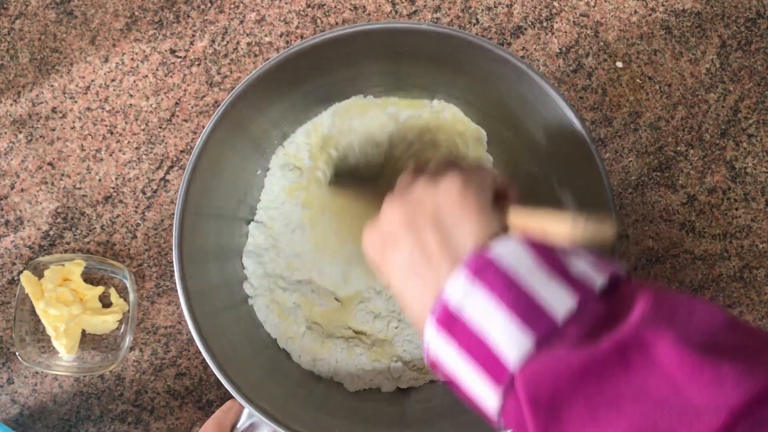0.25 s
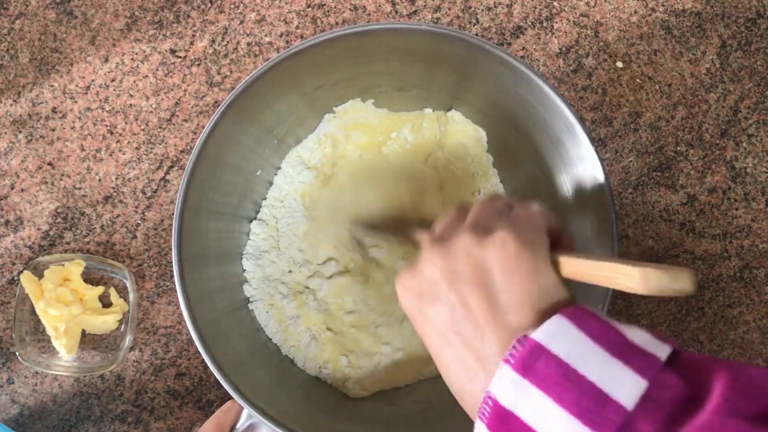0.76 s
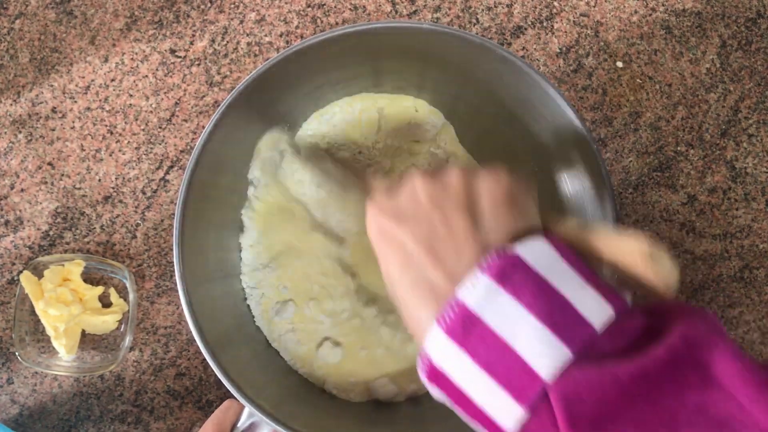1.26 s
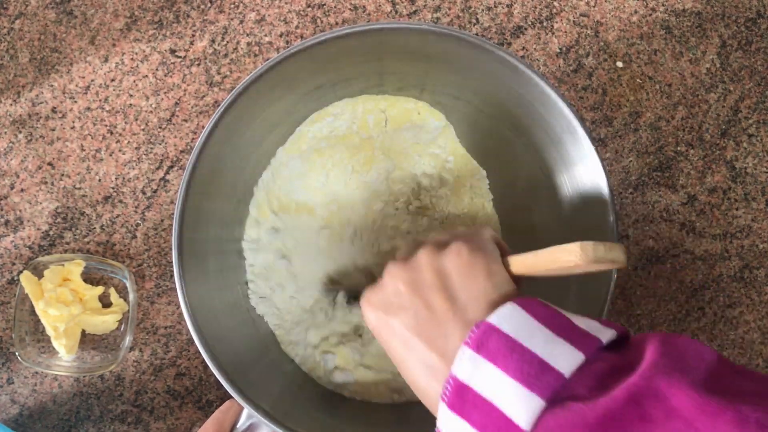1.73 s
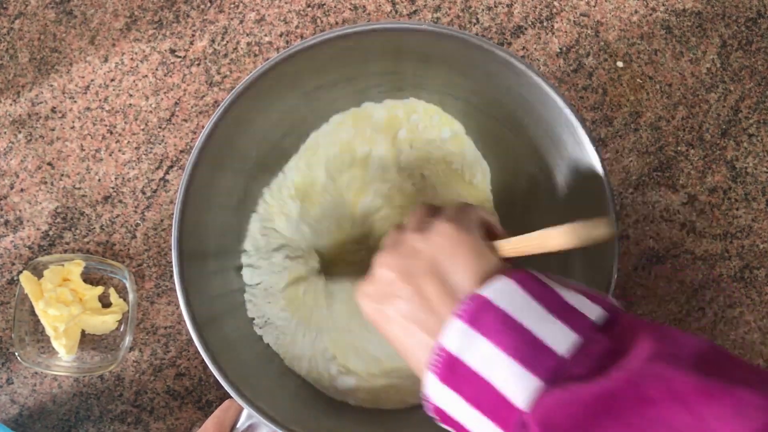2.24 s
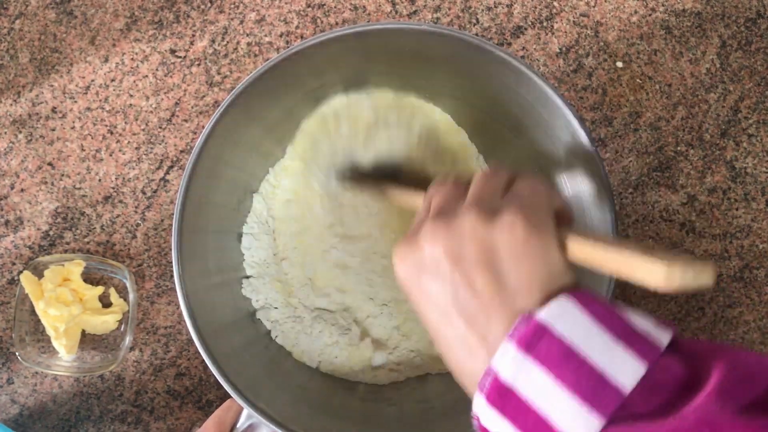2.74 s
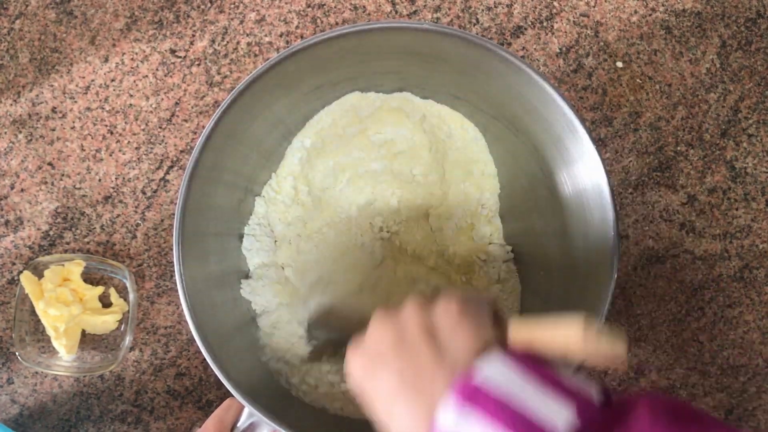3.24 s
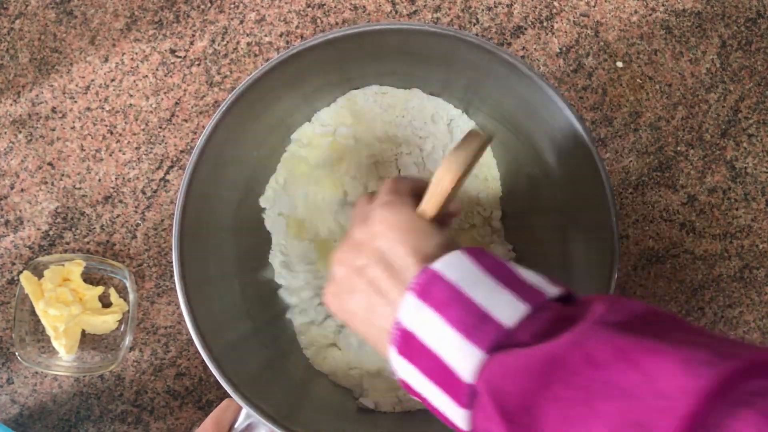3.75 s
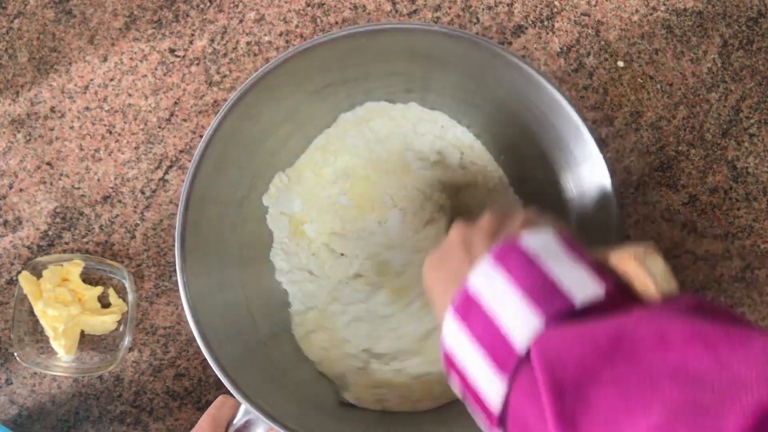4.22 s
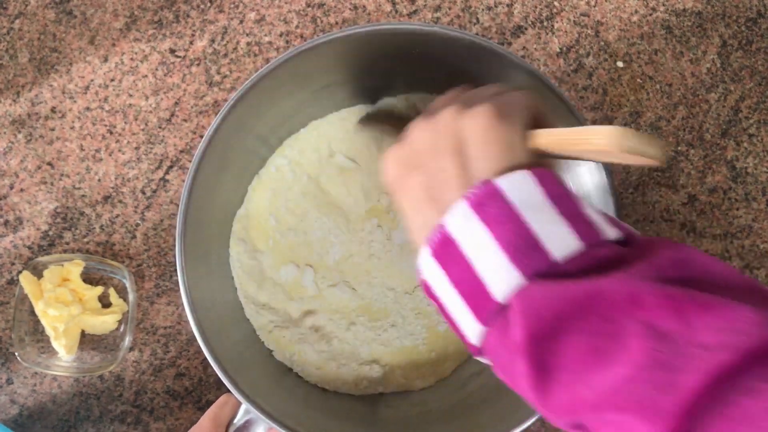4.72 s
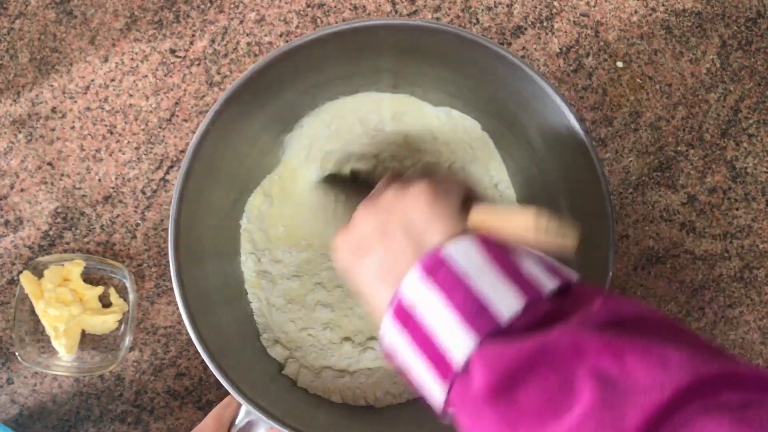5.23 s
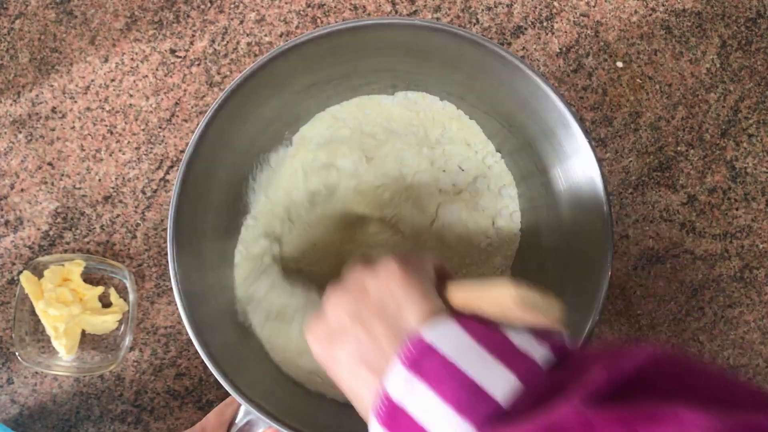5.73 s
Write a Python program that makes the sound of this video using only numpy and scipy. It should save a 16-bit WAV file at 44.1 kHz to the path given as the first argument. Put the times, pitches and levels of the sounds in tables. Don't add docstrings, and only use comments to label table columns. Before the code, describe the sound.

Close to a single microphone in a quiet kitchen, a wooden spatula sweeps dry flour round a steel bowl. Brisk strokes come two or three a second, each starting with a tick and trailing into grainy scraping. Thin metallic squeaks flicker at the rim; the bowl bumps dully on stone, with the strongest thuds and one sharp knock in the last second.

```python
import sys
import numpy as np
from scipy import signal
from scipy.fft import rfft, irfft, next_fast_len
from scipy.io import wavfile
from scipy.ndimage import uniform_filter1d

SR = 44100
rng = np.random.default_rng(int(sys.argv[2]) if len(sys.argv) > 2 else 0)


def makeup_ratio(level_db):
    decades = np.asarray(level_db, float) / 20
    return 10 ** decades


def pcm_store(signal):
    levels = np.round(np.clip(np.atleast_2d(signal), -1, 1) * 32767)
    wavfile.write(sys.argv[1], SR, levels.astype(np.int16).T)


N = 263365

# (frequency [Hz], width [Hz], level [dB])
WALL_MODES = [(800, 1200, -82), (946, 23, 11), (1100, 175, 13.5), (1280, 320, -91), (1520, 140, 3),
              (1640, 46, 12), (1780, 48, -0.5), (1890, 28, 9.5), (2150, 98, -4), (2310, 26, 12.5),
              (2396, 370, 11), (2750, 120, -28)]
# (frequency [Hz], density [dB per Hz])
GRIT_SPECTRUM = [(300, -5), (700, -4.5), (2600, -13), (3300, -3), (4500, -0.5), (4900, -6.5), (5250, 2),
                 (6500, -1.5), (8500, -2.5), (9800, -4), (10400, -11), (11200, -5), (12800, -3),
                 (16000, -10)]


def drag():
    # (landing [s], length [s], grit hiss [dB], wall shaking [dB],
    # best-driven wall region [Hz])
    strokes = [(0.0, 0.085, -43, -47, 1600), (0.261, 0.21, -40.5, -41.5, 1730),
               (0.535, 0.12, -53.5, -62, 1890), (0.618, 0.12, -50, -51, 2400),
               (0.651, .22, -43.5, -46.5, 1850), (1.001, 0.31, -39, -41, 1740),
               (1.423, 0.3, -47, -51.5, 1780), (1.75, 0.19, -41, -43.5, 1800),
               (2.134, 0.21, -38, -39, 1950), (2.528, 0.18, -49.5, -57, 2360), (2.557, .18, -42, -42, 2480),
               (2.832, 0.083, -53.5, -64, 1780), (2.939, 0.22, -39.5, -39.5, 1870),
               (3.321, 0.24, -41, -44, 1680), (3.68, 0.26, -42.5, -41.5, 1700),
               (4.069, 0.42, -45.5, -45.5, 1560), (4.618, 0.093, -48, -49.5, 2100),
               (4.756, 0.043, -48, -46.5, 1750), (5.083, 0.099, -57, -43, 1020),
               (5.29, .14, -59, -49.5, 1900), (5.481, 0.11, -54, -44.5, 1100),
               (5.678, 0.14, -49, -45.5, 1640), (5.727, 0.09, -47, -38.5, 1310),
               (5.907, 0.12, -46.5, -47.5, 1650)]
    # (strongest [s], half length [s], grit hiss [dB],
    # wall shaking [dB], edge whistle [dB])
    pushes = [(0.271, 0.088, -48.5, -52.5, -58), (0.977, 0.029, -54, -82, -49.5),
              (1.21, 0.18, -50.5, -75, -50.5), (1.385, 0.021, -66, -90, -51.5),
              (1.522, 0.081, -56, -49, -44), (1.678, 0.35, -54.5, -60, -57.5),
              (1.905, 0.079, -54, -66, -46.5), (2.13, 0.047, -52.5, -59, -55),
              (2.29, 0.15, -49.5, -58.5, -48), (2.686, 0.08, -45, -56, -54), (2.888, 0.071, -66, -79, -54),
              (3.045, 0.18, -42.5, -50.5, -50), (3.264, .08, -59, -66, -68),
              (3.406, 0.086, -38.5, -39, -47), (3.761, .1, -47, -64, -41), (4.138, 0.075, -46, -41.5, -38),
              (4.354, 0.12, -46.5, -52.5, -56), (4.56, 0.26, -53.5, -66.5, -46),
              (4.863, 0.08, -44, -43, -40.5), (5.087, 0.32, -49.5, -63, -51), (5.255, 0.1, -46.5, -48, -68),
              (5.408, 0.13, -46.5, -58, -47), (5.633, 0.21, -45.5, -53, -48.5),
              (5.83, 0.15, -48.5, -56.5, -50)]
    # (strongest [s], half length [s], edge whistle [dB])
    squeaks = [(0.277, .02, -34), (.628, .015, -45), (.66, 0.014, -38), (1.017, 0.022, -42),
               (1.45, 0.031, -44), (1.635, .03, -50), (2.86, 0.031, -51), (3.186, 0.033, -48),
               (3.344, 0.036, -36), (4.617, 0.027, -47), (4.76, 0.018, -45.5)]
    landing_s, push_hz, stroke_rim_db = 0.003, 1520, -8.5
    fall_db = np.array([20, 20 * 1.17, 20 * 1.8])
    t = np.arange(0, N / SR, 0.0005)
    power = np.full((3, len(t)), 1e-12)
    focus = np.full(len(t), 1e-12 * push_hz)
    for s, length, hiss_db, wall_db, region_hz in strokes:
        gone = np.maximum(t - s, 0) / length
        start_db = np.c_[[hiss_db, wall_db, hiss_db + stroke_rim_db]]
        landing = np.clip((t - s) / landing_s, 0, 1) ** 2
        part = landing * makeup_ratio(start_db - np.outer(fall_db, gone ** 1.86)) ** 2
        power += part
        focus += part[1] * region_hz * (1 - 0.35 * np.minimum(gone, 1))
    for s, half, *levels_db in pushes:
        part = swell(t, s, half, np.c_[levels_db]) ** 2
        power += part
        focus += part[1] * push_hz
    for s, half, whistle_db in squeaks:
        power[2] += swell(t, s, half, whistle_db) ** 2
    rows = (*10 * np.log10(power), focus / power[1])
    return [np.interp(np.arange(N) / SR, t, row) for row in rows]


def scraping(hiss_db, wall_db, rim_db, focus_hz):
    # (frequency [Hz], width [Hz], level [dB])
    foot_modes = [(156, 51, 1.5), (220, 75, 4.5), (315, 29, -4), (366.5, 26, 1.5), (420, 41, -7),
                  (470, 130, -12.5)]
    # (frequency [Hz], width [Hz], level [dB])
    rim_modes = [(6300, 500, -25.5), (6910, 90, -7), (7590, 1200, 16.5), (8200, 130, 12)]
    fine = grains(20000, 0.8, 0.8)
    coarse = grains(4000, 2.4, 1.4)
    hiss = mottled(coloured(evened(fine) + 0.48 * evened(coarse), GRIT_SPECTRUM), 2.2)
    wall = body(coarse, WALL_MODES, 0.014, 2.0, focus_hz, 9)
    blade = evened(resonate(resonate(coarse, focus_hz, 920), 1910.0, 2860))
    blade = evened(high_pass(blade, 2, 850))
    rim = body(fine, rim_modes, 0.02, 2.2)
    foot = body(coarse, foot_modes, 0.015, 2.2)
    foot_db = lagged(wall_db, 0.024) - 0.5
    sound = makeup_ratio(hiss_db - 3.5) * hiss
    sound += makeup_ratio(wall_db - 1.52) * mottled(wall + makeup_ratio(-2.5) * blade, 1.72)
    sound += makeup_ratio(foot_db - 8.0) * foot
    return sound + makeup_ratio(rim_db - 6) * rim


def grains(per_s, spread_db, lumpy_db):
    size = makeup_ratio(spread_db * np.minimum(rng.exponential(1, N), 5))
    clicks = rng.standard_normal(N) * (rng.random(N) < per_s / SR)
    return size * clicks * makeup_ratio(lumpy_db * drift(170))


def spatula_ticks():
    # (time [s], peak [dB], tip tone [Hz], bright crack over the peak [dB])
    strikes = [(0.0044, -34, 2480, -3), (0.266, -19, 2400, 2.5), (0.2712, -23.5, 1520, -2),
               (0.6585, -23, 2420, -1), (1.008, -14.5, 1520, -3), (1.057, -29.5, 1640, 8),
               (1.2901, -39.5, 1520, -12), (1.4231, -54, 2590, -12), (1.7536, -28, 1730, -3),
               (2.138, -23.5, 1520, -2), (2.566, -37, 2430, -15), (2.6361, -30.5, 1600, 7.5),
               (2.696, -40, 1500, -6), (2.815, -27.5, 2120, -35), (2.821, -31.5, 2180, -31),
               (2.941, -35, 1280, -15), (3.3155, -39, 2120, 0), (3.345, -28, 2040, -5),
               (3.6794, -22.5, 1104, -26), (3.7205, -32, 1060, 7), (3.846, -31.5, 1850, 3.5),
               (4.0745, -31, 2150, -19), (4.147, -26.5, 1500, -19), (4.2205, -36, 1110, -24),
               (4.6205, -36.5, 1340, -29), (4.759, -29, 2380, -6), (4.8157, -36, 1820, -15),
               (5.296, -33, 2310, -12), (5.689, -30, 2900, 6), (5.7395, -12.5, 2310, -0.5)]
    mix = np.zeros(N)
    for s, *blow in strikes:
        add(mix, s, tick(*blow))
    return mix


def tick(peak_db, tip_hz, crack_db):
    t = np.arange(2048) / SR
    chance = rng.standard_normal(len(t))
    rise = t * tip_hz / 2.2
    burst = np.sin(2 * np.pi * tip_hz * t) * rise * np.exp(1 - rise)
    ring = np.zeros(len(t))
    for (hz, width, db), luck in zip(WALL_MODES, chance):
        level_db = db + 1.6 * np.clip(luck, -1, 1) - 2.4 * abs(np.log2(hz / tip_hz))
        ring += makeup_ratio(level_db - 60 * t / 0.027) * np.sin(2 * np.pi * hz * t + 3 * luck)
    ring *= 1 - np.exp(-t / 0.0015)
    crack = coloured(chance, GRIT_SPECTRUM[2:]) * makeup_ratio(-60 * t / 0.073) * (1 - np.exp(-t / 0.00019))
    sound = 0.45 * burst + makeup_ratio(-23.5) * ring + makeup_ratio(crack_db - 16.5) * crack
    fade_out = signal.windows.tukey(2 * len(t), 0.3)[len(t):]
    return makeup_ratio(peak_db) * sound * fade_out


def bowl_thuds():
    # (time [s], peak [dB], wall tone [Hz], counter thump over the peak [dB])
    slaps = [(0.004, -37.5, 396, -8), (1.427, -39.5, 340, -1.5), (1.552, -31.5, 337, -8),
             (1.754, -27.5, 434, -10.5), (2.177, -42, 355, 18), (2.564, -36.5, 397, 15),
             (2.945, -24.5, 368, -13), (3.023, -32, 360, -7), (3.316, -25.5, 385, -13),
             (3.684, -24.5, 396, -1.5), (3.852, -32.5, 420, 8.5), (4.755, -39.5, 425, -1),
             (5.099, -14, 430, -8), (5.497, -17.5, 412, -9.5), (5.93, -21.5, 403, -5.5)]
    # (time [s], peak [dB], wall tone [Hz], counter thump over the peak [dB])
    rocks = [(0.274, -34.5, 351, -12), (0.294, -42.5, 342, 6), (0.664, -54, 366, -21), (0.727, -49, 423, 8),
             (1.013, -31, 360, -7.5), (1.816, -27, 332, -1.5), (2.239, -34.5, 361, 5),
             (2.557, -42.5, 394, 3), (2.695, -42.5, 360, -1), (2.821, -50, 350, -13),
             (4.073, -44.5, 343, 8), (4.22, -40.5, 368, -15), (4.62, -32.5, 361, 1), (4.817, -37.5, 370, 8),
             (5.301, -30.5, 350, 0), (5.691, -30, 457, -2), (5.744, -18.5, 356, -1.5)]
    mix = np.zeros(N)
    for events, slap_db in ((slaps, -7.5), (rocks, -21)):
        for s, *blow in events:
            add(mix, s, thud(*blow, slap_db))
    return high_pass(mix, 2, 85)


def thud(peak_db, wall_hz, thump_db, slap_db):
    # (frequency [Hz], level [dB], t60 as a share of the knock's [1])
    knock_modes = [(108.5, -15, 6.6), (159.3, 3, 1.57), (196, -2, 0.74), (290, -5, 1.5), (363.3, 4.5, 1.03),
                   (420, -0.5, 1.06), (480, -15, 0.7)]
    t = np.arange(SR // 4) / SR
    ring_s = np.clip(0.043 - 0.13 * peak_db, 0.06, 0.15)
    settle_s = 0.01
    settled_t = t + 0.053 * settle_s * (1 - np.exp(-t / settle_s))
    choke_db = 20 * (t / 0.13) ** 2
    ring = np.zeros(len(t))
    for hz, db, share in knock_modes:
        luck = np.clip(rng.standard_normal(), -1.5, 1.5)
        low = hz < 250
        tone_db = thump_db - 0.5 if low else -22 * abs(np.log2(hz / wall_hz))
        chatter_db = 3.5 * np.sin(2 * np.pi * 41.7 * (1 + 0.29 * luck) * t * (1 + 8 * t))
        level_db = db + tone_db + 2.6 * luck - 60 * t / (ring_s * share) - choke_db + chatter_db
        ring += (-1) ** low * makeup_ratio(level_db) * np.sin(2 * np.pi * hz * (1 + 0.033 * luck) * settled_t)
    ring *= 1 - np.exp(-t / 0.0007)
    slap = np.zeros(len(t))
    for hz, db, t60_s in ((690, -35, 0.0033), (935, -10.5, 0.033), (1100, -12, 0.026),
                          (1360, -11.0, 0.0084), (1920, -21, 0.004), (2400, -18, 0.015)):
        slap += np.sin(2 * np.pi * hz * t) * makeup_ratio(db - 60 * t / t60_s)
    return makeup_ratio(peak_db) * (slap * makeup_ratio(slap_db) - ring / abs(ring).max())


def reflections(x):
    taps, step = np.zeros(SR // 4), 20
    at = np.arange(140, len(taps) - step, step)
    signs = rng.choice([-1., 1.], len(at))
    taps[at + rng.integers(0, step, len(at))] = signs * makeup_ratio(-60 * at / SR / 0.26)
    return signal.oaconvolve(x, taps / np.linalg.norm(taps))[:N]


def counter_shudder(wall_db):
    # (strongest [s], half length [s], level [dB])
    leans = [(0.038, 0.18, -57.5), (0.92, 0.099, -53), (1.306, 0.072, -62), (1.62, 0.079, -70),
             (2.29, 0.11, -60), (2.543, 0.08, -65), (2.75, .1, -56), (3.352, 0.055, -46), (3.706, .1, -55),
             (4.676, 0.083, -52), (4.888, .1, -56), (5.35, 0.086, -51), (5.865, 0.08, -60)]
    t = np.arange(N) / SR
    level = makeup_ratio(-76) + makeup_ratio(lagged(wall_db, 0.025) - 18.5)
    for s, half, db in leans:
        level += swell(t, s, half, db)
    return level * body(rng.standard_normal(N), [(52, 25, -2), (100, 35, 0)], 0.05, 3.5)


def kitchen():
    # (frequency [Hz], density [dB per Hz])
    room_spectrum = [(25, 5), (60, -13.5), (110, 4), (175, -7), (300, -12), (500, -13.5), (720, -20),
                     (1050, -19.5), (1600, -17), (4500, -21), (7600, -18.5), (10400, -26), (12500, -24.5),
                     (16000, -22.5)]
    noise = mottled(coloured(rng.standard_normal(N), room_spectrum), 3.2)
    return makeup_ratio(-52.5 - 6.0 + 0.2 * drift(0.43)) * noise


def body(x, modes, wander, patchy_db, focus_hz=1600., focus_db=0):
    total = np.zeros(len(x))
    for k, (hz, width, db) in enumerate(modes):
        level_db = db + patchy_db * drift(9.5) - focus_db * abs(np.log2(hz / focus_hz))
        mode = evened(resonate(x, hz * (1 + wander * drift(7.3)), width))
        total += (-1) ** k * makeup_ratio(level_db) * mode
    return evened(total)


def resonate(x, hz, width):
    turn = np.exp(2j * np.pi * np.cumsum(hz * np.ones(len(x))) / SR)
    r = np.exp(-np.pi * width / SR)
    return 2 * (turn * signal.lfilter([1 - r], [1, -r], x / turn)).real


def mottled(x, patchy_db):
    z = signal.stft(x, nperseg=256, noverlap=192)[2]
    patches = uniform_filter1d(rng.standard_normal(z.shape), 3, 0)
    patches = evened(uniform_filter1d(patches, 18, 1))
    return evened(signal.istft(z * makeup_ratio(patchy_db * patches), nperseg=256, noverlap=192)[1][:N])


def coloured(x, points):
    hz, db = np.transpose(points)
    size = next_fast_len(len(x))
    bins = np.fft.rfftfreq(size, 1 / SR)
    gain = makeup_ratio(np.interp(np.log(bins + 1), np.log(hz + 1), db))
    return evened(irfft(rfft(x, size) * gain, size)[:len(x)])


def drift(hz):
    step = 32
    span = max(int(SR / step / hz), 2)
    slow = uniform_filter1d(uniform_filter1d(rng.standard_normal(N // step + 2), span), span)
    return evened(np.interp(np.arange(N) / step, np.arange(len(slow)), slow))


def swell(t, s, half, db):
    return makeup_ratio(db - 20 * ((t - s) / half) ** 2)


def lagged(db, lag_s):
    stay = np.exp(-1 / (lag_s * SR))
    return 10 * np.log10(signal.lfilter([1 - stay], [1, -stay], makeup_ratio(db) ** 2) + 1e-14)


def high_pass(x, order, hz):
    return signal.sosfilt(signal.butter(order, hz, "high", fs=SR, output="sos"), x)


def evened(x):
    return x / np.sqrt(np.mean(x ** 2) + 1e-20)


def add(mix, s, sound):
    part = mix[round(s * SR):][:len(sound)]
    part += sound[:len(part)]


def scene():
    levels = drag()
    blows = spatula_ticks() + bowl_thuds()
    echo = reflections(makeup_ratio(-15) * blows)
    mix = scraping(*levels) + blows + echo + counter_shudder(levels[1]) + kitchen()
    return np.tile(mix, (2, 1))


def top_cut(x):
    return signal.sosfilt(signal.butter(12, 16790, fs=SR, output="sos"), x)


def record(dry):
    thin = high_pass(dry[0], 3, 48)
    band_limit = signal.firwin(511, 15800, window=("kaiser", 9), fs=SR)
    heard = signal.oaconvolve(thin, band_limit, "same")
    return top_cut(np.tile(heard, (2, 1)))


dry = scene()
out = record(dry)
pcm_store(out)
```